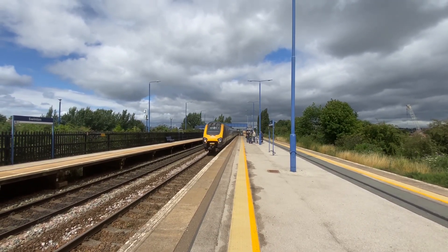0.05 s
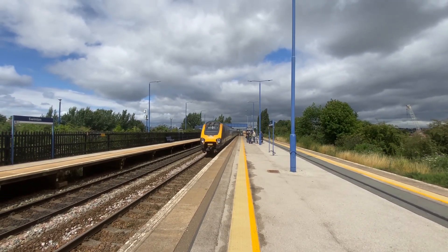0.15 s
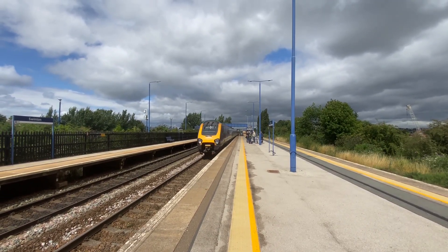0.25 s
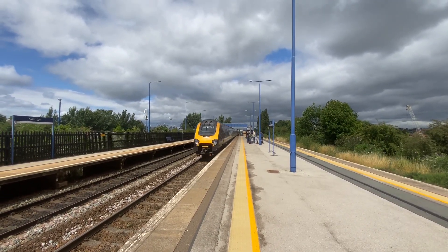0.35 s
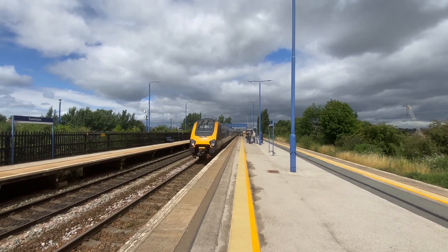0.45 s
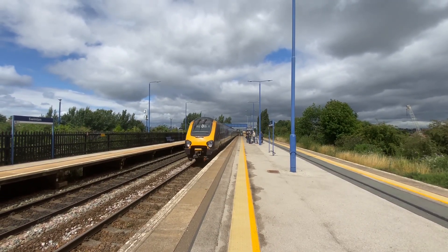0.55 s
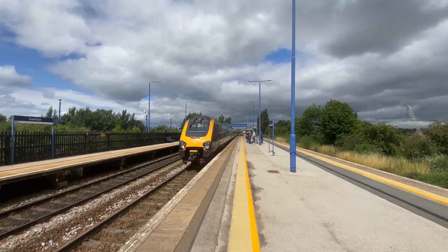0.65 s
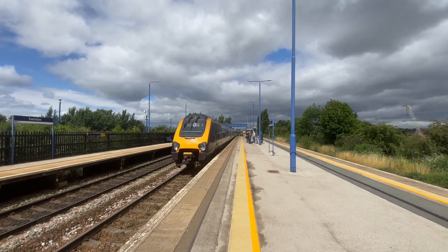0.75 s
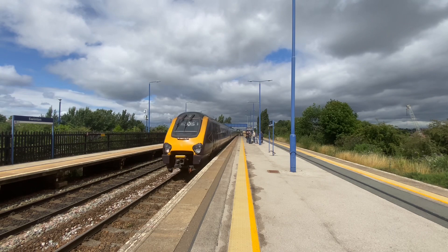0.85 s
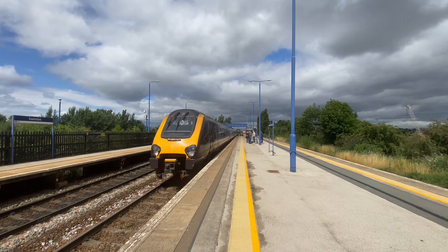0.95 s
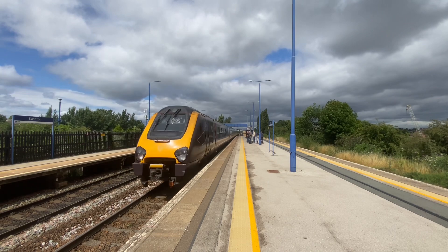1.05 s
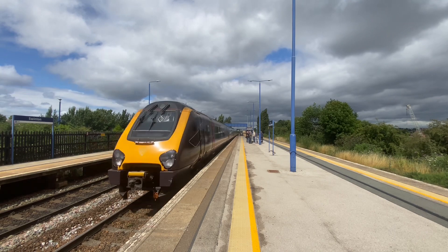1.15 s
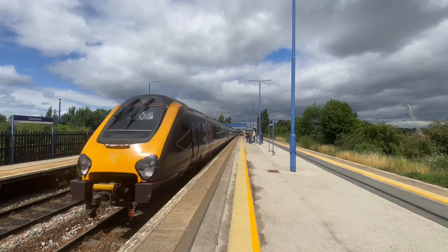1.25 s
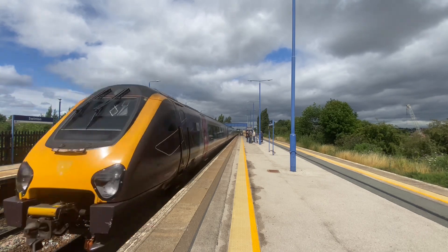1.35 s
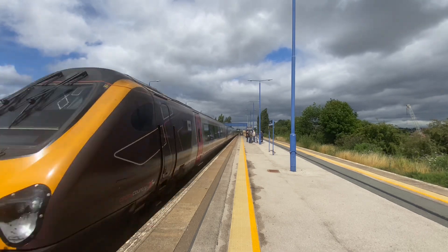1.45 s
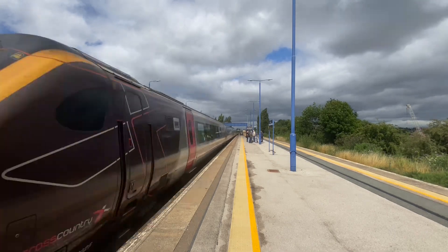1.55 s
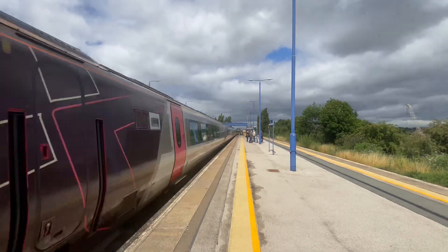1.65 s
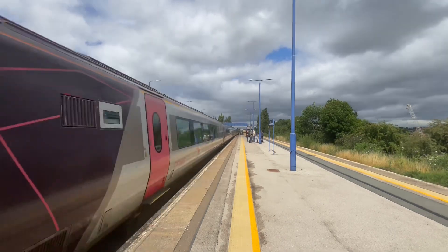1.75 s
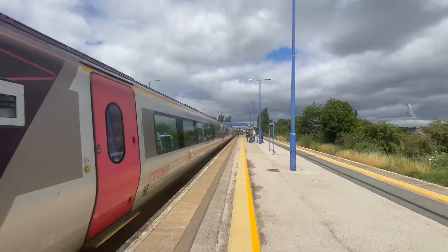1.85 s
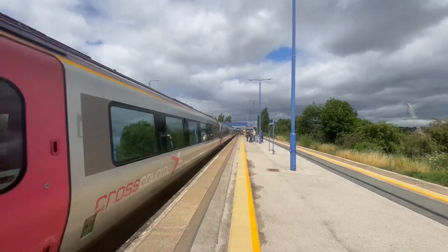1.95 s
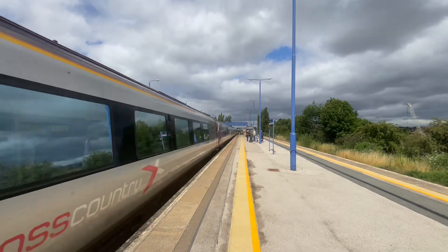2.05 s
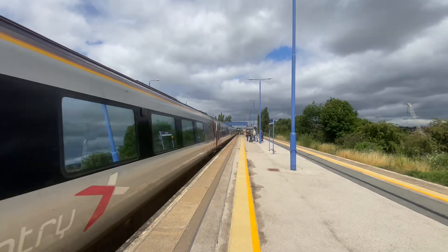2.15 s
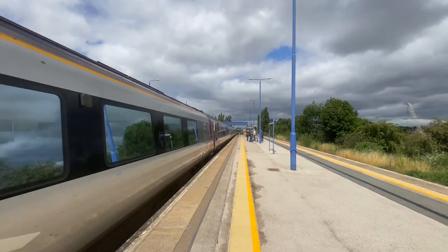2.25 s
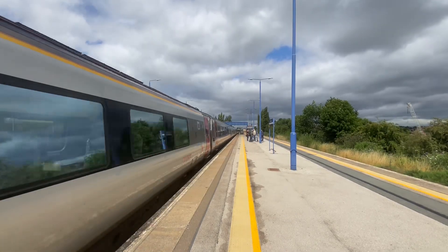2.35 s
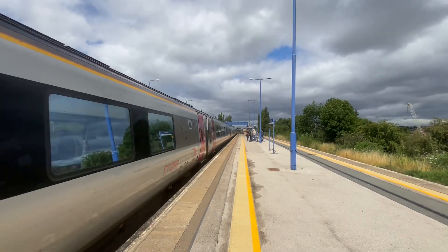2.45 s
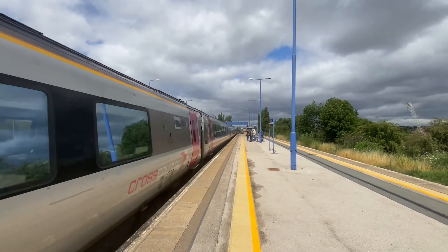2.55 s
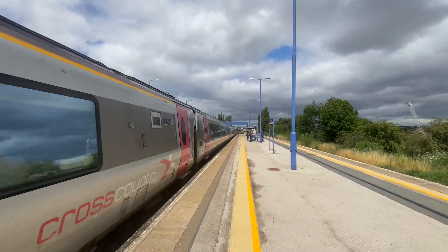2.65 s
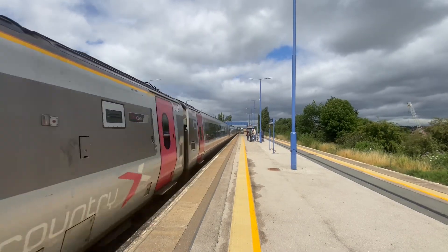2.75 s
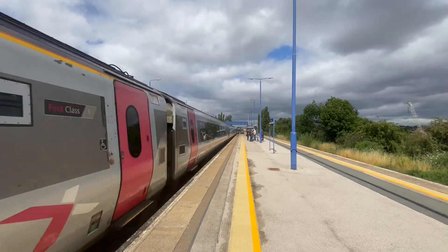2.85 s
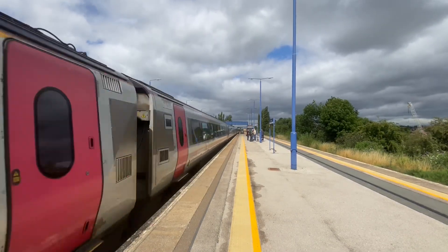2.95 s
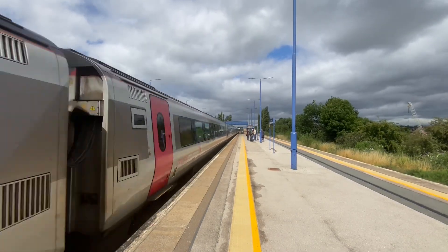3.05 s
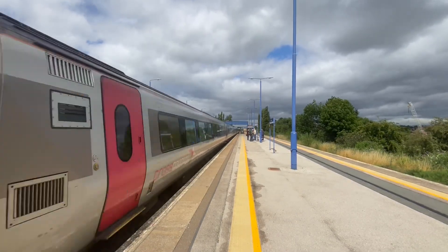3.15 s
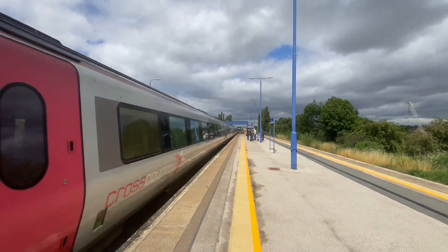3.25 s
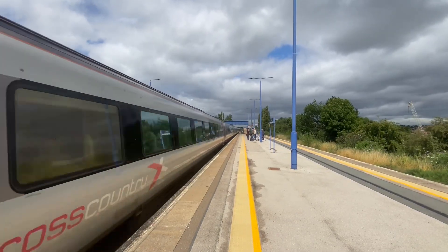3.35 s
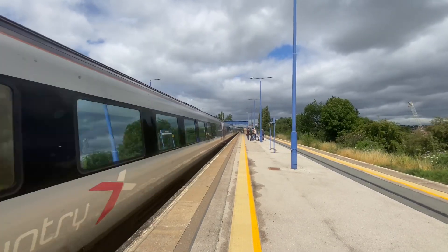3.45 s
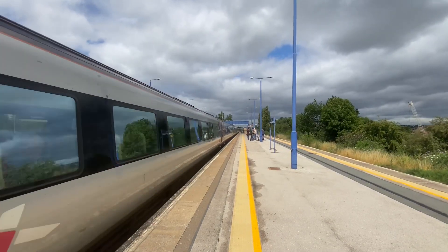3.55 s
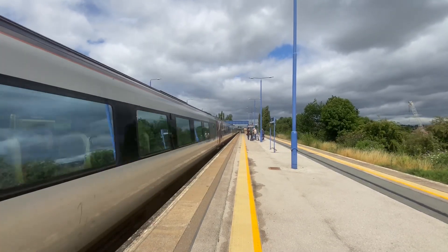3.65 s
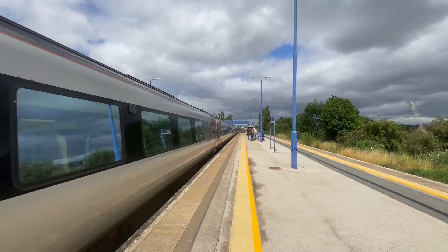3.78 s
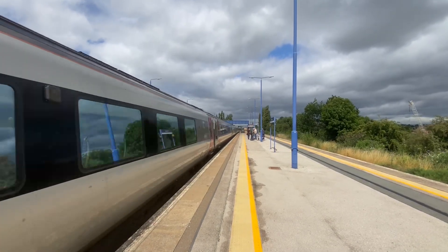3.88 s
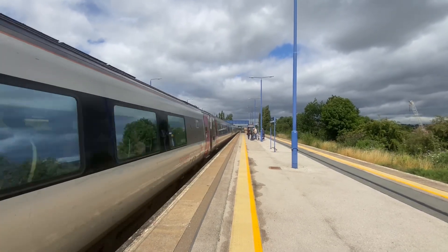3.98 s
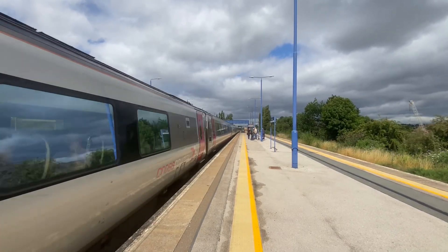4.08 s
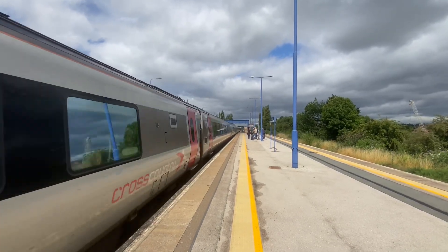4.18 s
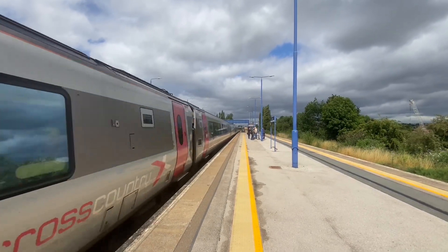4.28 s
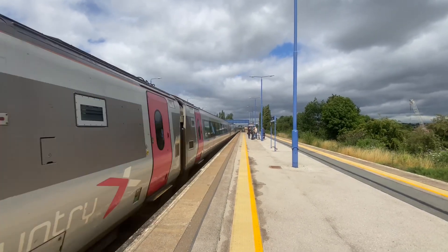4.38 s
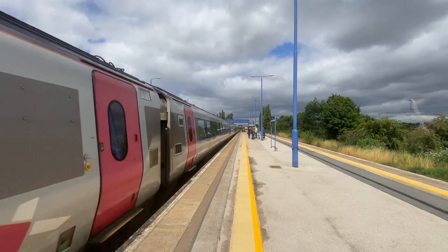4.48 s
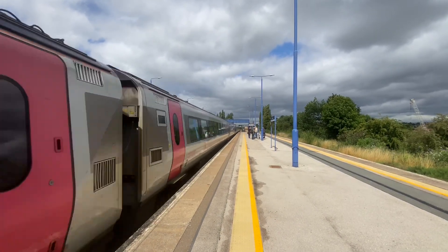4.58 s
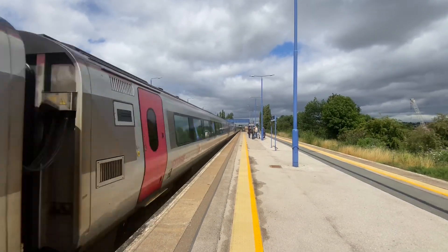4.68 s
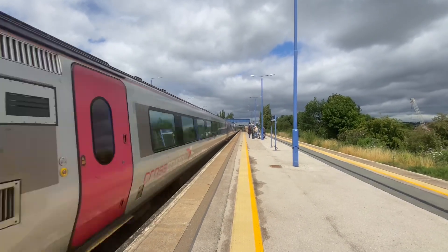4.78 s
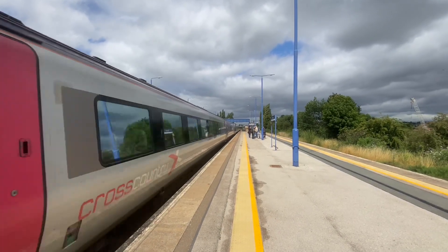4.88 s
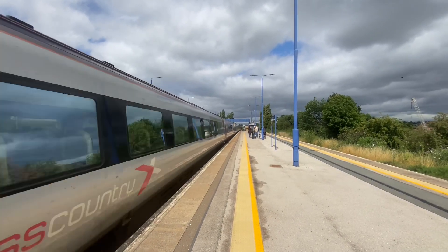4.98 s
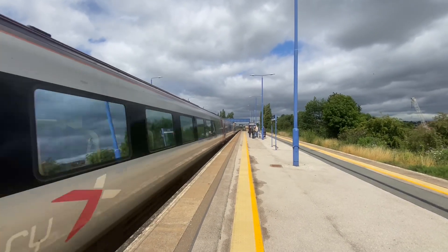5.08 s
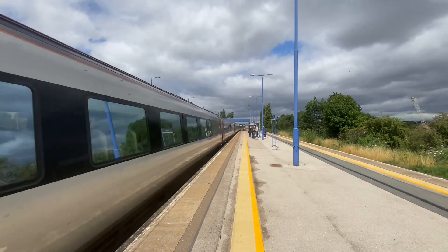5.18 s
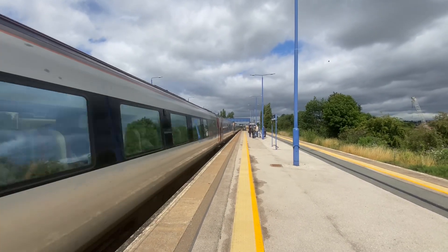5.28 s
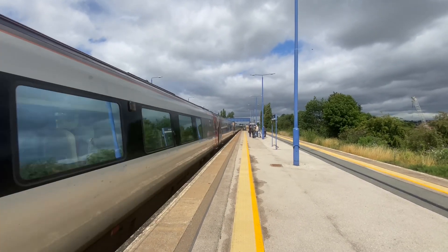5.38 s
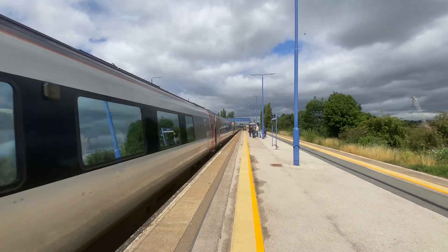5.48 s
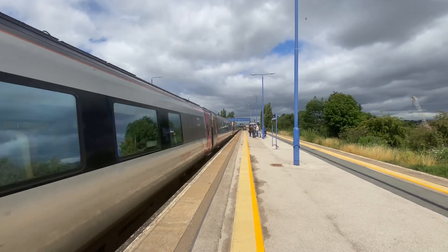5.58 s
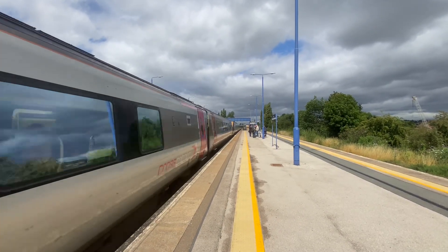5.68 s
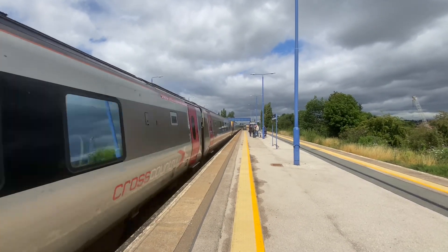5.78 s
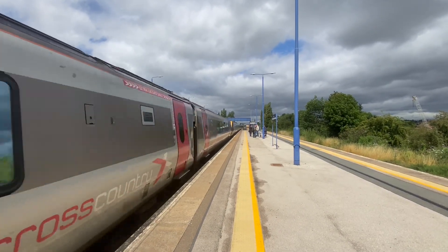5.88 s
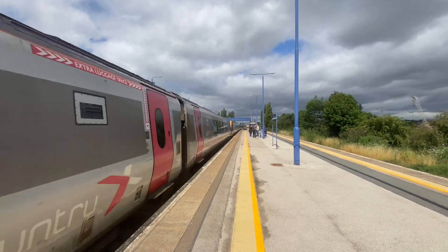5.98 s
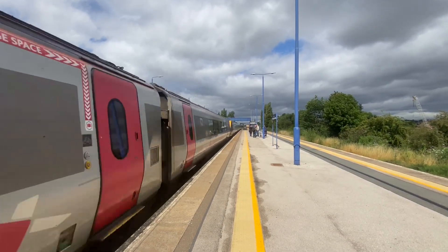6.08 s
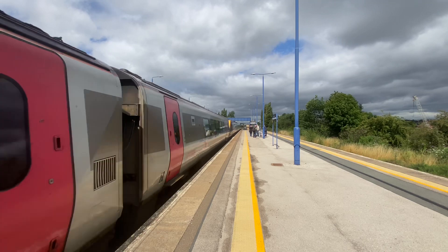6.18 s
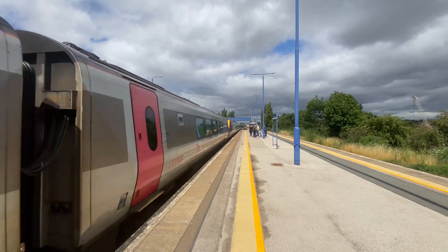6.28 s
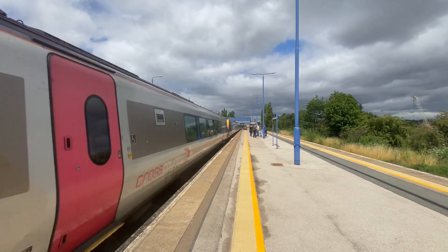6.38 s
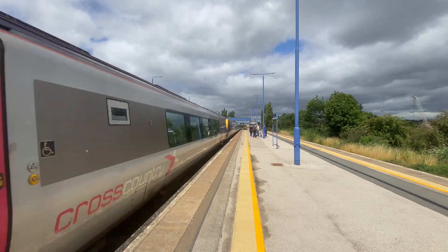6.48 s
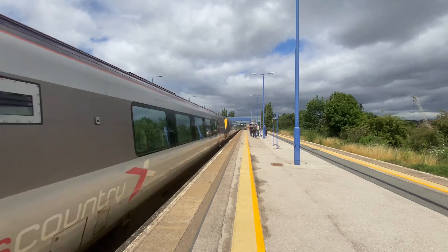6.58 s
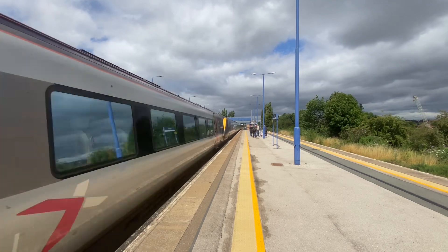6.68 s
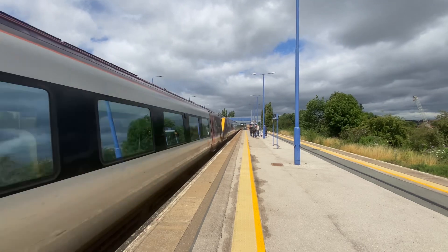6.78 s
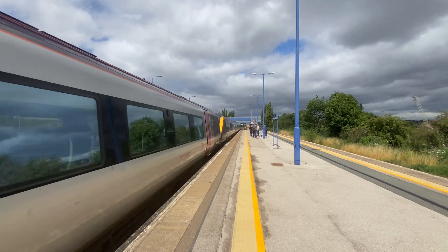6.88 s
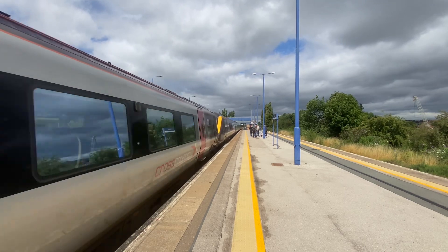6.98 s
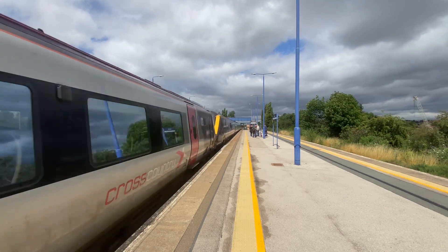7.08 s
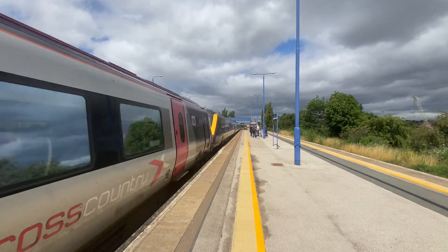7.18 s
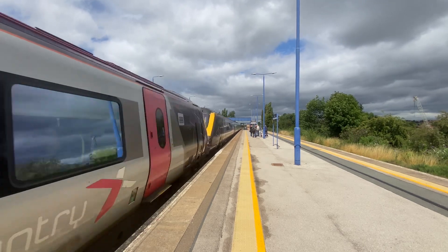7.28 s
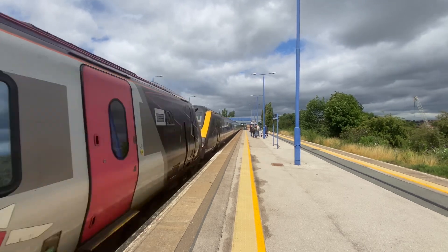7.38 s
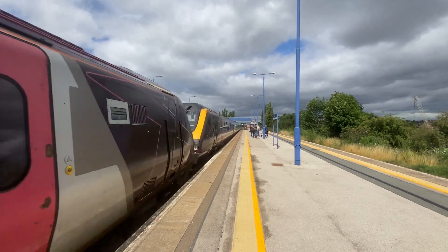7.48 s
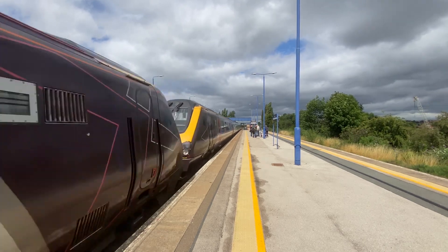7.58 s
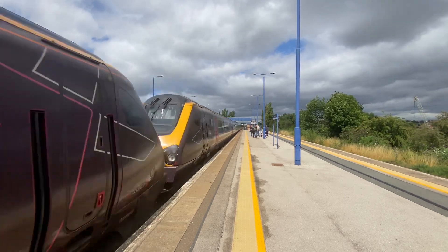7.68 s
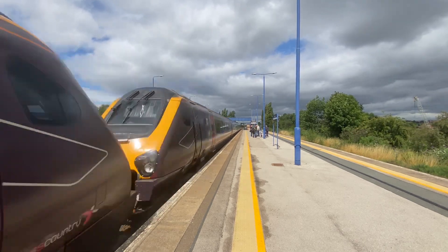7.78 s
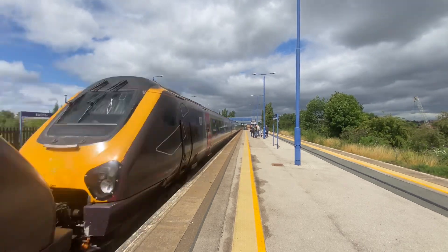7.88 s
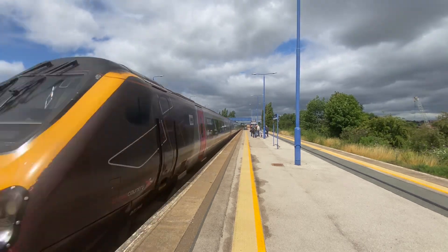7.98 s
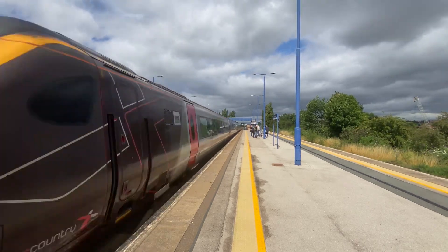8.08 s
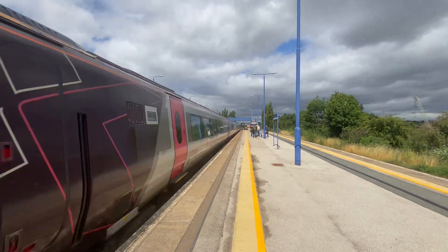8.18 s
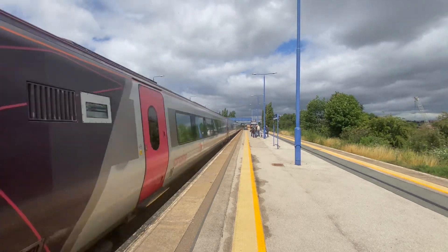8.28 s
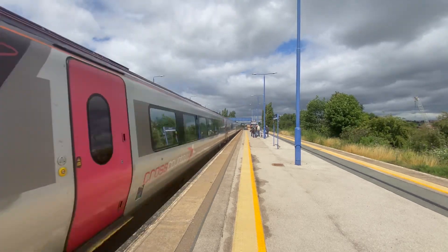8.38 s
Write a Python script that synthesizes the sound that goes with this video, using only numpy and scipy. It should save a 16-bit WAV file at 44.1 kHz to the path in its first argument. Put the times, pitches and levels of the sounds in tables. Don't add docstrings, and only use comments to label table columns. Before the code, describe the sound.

A diesel train swells from a distant rumble into a close roar, wheels thumping, engines droning past and revving higher, air hissing from its sides.

```python
import sys
import numpy as np
from scipy import signal
from scipy.fft import rfft, irfft
from scipy.io import wavfile
from scipy.ndimage import uniform_filter1d

SR = 44100
rng = np.random.default_rng(int(sys.argv[2]) if len(sys.argv) > 2 else 0)


def bounce(signal):
    frames = np.transpose(np.atleast_2d(signal))
    limited = np.clip(frames, -1, 1)
    pcm = np.round(limited * 32767).astype(np.int16)
    wavfile.write(sys.argv[1], SR, pcm)


def gain_from_db(level_db):
    decades = np.asarray(level_db, float) / 20
    return 10 ** decades


N = 372204

TRAIN_M_PER_S, SOUND_M_PER_S = 14.6, 343
ENGINE_M = 3.644


def evened(x):
    return x / np.sqrt(np.mean(abs(x) ** 2) + 1e-20)


def smooth_twice(x, size, axis=-1):
    return uniform_filter1d(uniform_filter1d(x, size, axis), size, axis)


def read(points, hz):
    f, *columns = np.transpose(points)
    return np.array([np.interp(np.log(hz + 1), np.log(f + 1), c) for c in columns])


def add(mix, s, sound):
    part = mix[round(s * SR):][:len(sound)]
    part += sound[:len(part)]


def lobe(past_m, db, spread_m):
    return gain_from_db(db) / (1 + (past_m / spread_m) ** 2) ** 1.38


def roar(patchy_db=1.07, flicker_db=0.92):
    # t/s, level/dB
    passing = [(0, -17), (.6, -15), (1.08, -11.5), (1.3, -7.5), (1.62, -2.5), (1.95, 1.2), (2.15, -0.7),
               (2.7, 3), (3.1, 0.3), (3.7, -2.5), (4.1, 1), (4.8, -1.5), (5.2, -2), (5.8, 4.5),
               (6.45, -0.5), (7.02, 3), (7.4, -1.3), (8.44, -3.5)]
    # level alongside/dB, share of the swell, change per s before the nose arrives/dB
    layers = [
        (-31, 0.66, -7),
        (-21, 1.066, -0.5),
        (-27.5, 0.51, -3.5),
        (-53, 0.4, -1.5),
    ]
    # t/s, level/dB, spread/m
    grilles = [(1.62, -53, 3.5), (2.5, -45, 3.5), (3.92, -62, 2.1), (4.85, -48.5, 4.6), (5.66, -37.5, 2.9),
               (6.72, -39.5, 2.7), (7.0, -26.5, 1.7), (7.16, -34.5, 1.5), (7.62, -44.5, 3.3),
               (8.4, -44.5, 2.96)]
    # f/Hz, level per Hz/dB
    rumble = [(22, -40), (38, -14), (50, -10), (70, 8.5), (110, 1), (180, 8.5), (260, 0.5), (400, -10.5),
              (700, -28), (2000, -68)]
    # f/Hz, level per Hz/dB
    rail = [(100, -48), (250, -14), (400, -1.5), (560, -4.5), (780, -3), (950, -4.5), (1200, -6),
            (1500, -9), (1800, -5.5), (2200, -27), (4000, -47.5)]
    # f/Hz, level per Hz/dB
    wheel = [(900, -45), (2000, -4), (2350, -4), (2700, -10), (3100, -8.5), (3700, -12), (4300, -15),
             (4900, -16), (5500, -18.5), (6400, -17.5), (7200, -22), (9000, -29.5), (13000, -37)]
    # f/Hz, level per Hz/dB
    air = [(600, -40), (1200, 10), (2800, 9.5), (4200, 8), (6000, 6), (7500, 4.5), (10000, 0.5),
           (12000, -3), (13000, -15), (14300, -12), (15100, -12), (15700, -45)]
    # f/Hz, change/dB
    far = [(100, 3), (250, 4), (380, 0), (600, 6.5), (1500, 3.5), (2000, 3.5), (2500, -3), (3000, -8.5),
           (4000, -1), (9000, 0), (12000, 6), (15000, 8)]
    arrival_s = 1.78

    frames, hz = N // 256 + 5, np.fft.rfftfreq(1024, 1 / SR)
    t = np.arange(frames) * 256 / SR
    swell_db = np.interp(t, *np.transpose(passing))
    early = np.maximum(arrival_s - t, 0)
    levels = [gain_from_db(db + share * swell_db + early_db * early) for db, share, early_db in layers]
    levels[-1] = levels[-1] + sum(lobe(TRAIN_M_PER_S * (t - s), db, w) for s, db, w in grilles)
    bands = [(260, 420), (450, 1400), (2000, 3500), (7000, 12000)]  # Hz, where each level holds
    power = 0
    for shape, level, (lo, hi) in zip([rumble, rail, wheel, air], levels, bands):
        density = gain_from_db(read(shape, hz)[0]) ** 2
        density = density / density[(hz >= lo) & (hz < hi)].sum()
        flicker = evened(uniform_filter1d(rng.standard_normal(frames), 4))
        power = power + density * (level * gain_from_db(flicker_db * flicker))[:, None] ** 2

    patches = uniform_filter1d(rng.standard_normal((frames, 513)), 8, 1)
    patches = evened(uniform_filter1d(patches, 14, 0))
    far_db = np.minimum(early, 1)[:, None] * read(far, hz)
    strength = np.sqrt(power) * gain_from_db(patchy_db * patches + far_db)
    noise = rng.standard_normal((frames, 513, 2, 2)) @ np.array([1, 1j])
    z = noise * strength[..., None]
    return 0.79 * signal.istft(z.T, nperseg=1024, noverlap=768)[1][:, :N]


def pipe(hz):
    # note/Hz, half width/Hz, level away from the note/dB
    tail_pipe = (239.5, 14, -10.5)
    note_hz, half_hz, away_db = tail_pipe
    return gain_from_db(away_db) + 1 / (1 + ((hz - note_hz) / half_hz) ** 2)


def engine(beside_s, rate_hz, lobes, thirds, lag=1.77):
    # multiple of a third of the firing rate, level under the third tone/dB
    crank = [(2, -14), (4, -29), (8, -3.5), (10, -14), (11, -12), (12, -8), (13, -19)]
    t = np.arange(max(beside_s - 3, 0), beside_s + 2, 1 / SR)
    past = TRAIN_M_PER_S * (t - beside_s)
    away = np.hypot(past, ENGINE_M)
    hz = rate_hz(t) * (1 - TRAIN_M_PER_S / SOUND_M_PER_S * past / away)
    turn = 2 * np.pi * np.cumsum(hz) / SR

    gains = []
    for m, db, m2, db2, w in lobes:
        first = lobe(past - m, db, w * (1 + 0.025 * abs(m)))
        second = lobe(past - m2, db2, w * (1 + 0.025 * abs(m2)))
        spill = gain_from_db(max(db, db2) - 14) * ENGINE_M / away
        gains.append(first + second + spill)
    tones = sum(g * np.cos(k * turn + (k - 1) * lag) for k, g in zip([1, 2, 3, thirds / 3], gains))
    faint = 0
    for k, db in crank:
        order = round(k) / 3
        phase = 2 * np.pi * rng.random()
        faint = faint + gain_from_db(db) * pipe(order * hz) * np.cos(order * turn + phase)
    uneven = 1 + .06 * evened(smooth_twice(rng.standard_normal(len(t)), 500))
    fade = signal.windows.tukey(len(t), .08)
    return t[0], np.sqrt(2) * (tones + gains[2] * faint) * uneven * fade


def engines_passing():
    engines = [(2.9, 1.001), (4.45, 1.009), (6.05, .995), (7.2, .998), (8.7, .999), (7.45, 1.001)]
    uneven_thirds = [7, 7, 5, 5, 5, 7]
    # t/s, firing rate/Hz
    throttle = [(0, 57.48), (3.6, 57.61), (3.9, 57.91), (4.13, 59.87), (4.36, 62.96), (4.59, 63.89),
                (4.81, 66.23), (5.04, 69.3), (5.26, 71.76), (5.49, 74.09), (5.72, 77.95), (5.95, 79.94),
                (6.2, 82.63), (6.5, 84.28), (6.75, 85.4), (7.0, 88.9), (7.5, 93.9), (8.44, 92.45)]
    # lobe past/m, level/dB, lobe past/m, level/dB, spread/m
    firing = [(-37, -42, -3.5, -16, 6.9), (-2.5, -14, 14.5, -17.5, 6.4), (-9.5, -13, 1.5, -19, 4.2),
              (-7.5, -26, -1, -25, 2.4), (-13.5, -30, -4.5, -28, 2.9), (-2, -35, 3, -40, 3)]
    # lobe past/m, level/dB, lobe past/m, level/dB, spread/m
    octave = [(-11.5, -24, -0.4, -14.5, 2.5), (-12, -25, 0.9, -11.5, 4.5), (-12.5, -13, -0.2, -14, 3.73),
              (-9.5, -23.5, 9, -25, 2.5), (-13, -28, -3.5, -26.5, 3.9), (1, -29.5, 8, -41, 2.2)]
    # lobe past/m, level/dB, lobe past/m, level/dB, spread/m
    twelfth = [(-21, -34.5, -4.5, -24.5, 6), (-18, -37, 1.8, -19, 6.4), (-1.5, -17.5, 5.5, -26.5, 2.9),
               (-7, -30, 7, -37, 3), (-12, -41, -8, -34, 1.6), (4, -33, -1, -50, 2.7)]
    # lobe past/m, level/dB, lobe past/m, level/dB, spread/m
    uneven_tone = [(-30.5, -38.5, -1.2, -20.5, 6.9), (-22, -26, 19, -31, 1.4), (-21, -51, .2, -25, 3.1),
                   (-6.5, -20.5, 15, -34, 4.2), (-21, -48, -7, -33, 2.2), (-3, -48, 3, -51, 3)]

    def pulling(t):
        return np.interp(t, *np.transpose(throttle))

    def idling(t):
        return 62.5 + 0 * t

    out = np.zeros(N)
    rates = [pulling] * (len(engines) - 1) + [idling]
    rows = zip(engines, rates, uneven_thirds, firing, octave, twelfth, uneven_tone)
    for (s, trim), rate, thirds, *lobes in rows:
        add(out, *engine(s, lambda t: trim * rate(t), lobes, thirds))
    return out


def thump(peak_db, hz, lasts=0.016, echo_s=.023, echo_db=-10.0):
    t = np.arange(round(.04 * SR)) / SR
    turn = 2 * np.pi * np.cumsum(hz * (0.867 + 0.733 * np.exp(-t / 0.0041))) / SR
    low, high = rng.uniform(.85, 1.15, 2)
    low_knock = 0.27 * np.sin(2 * np.pi * 300 * low * t)
    high_knock = .5 * np.sin(2 * np.pi * 1.4 * hz * high * t)
    swell_and_fade = (1 - np.exp(-t / 0.0018)) * np.exp(-(t / lasts) ** 2)
    ring = (np.sin(turn) + low_knock + high_knock) * swell_and_fade
    out = np.zeros(round(.15 * SR))
    for k in range(3):
        add(out, k * echo_s, gain_from_db(peak_db + k * echo_db) * ring)
    return out


def flat_wheels():
    flat_s = [.2322, .1515]
    # peak level of the first flat/dB, of the second/dB
    flat_db = [(-26, -36), (-20.5, -40), (-21.5, -33), (-20.5, -35), (-22, -28.5), (-17, -26), (-21, -27),
               (-20.5, -28), (-36, -31), (-16.5, -20)]
    # t/s, peak level/dB
    near_thumps = [(1.78, -22), (2.745, -17), (2.905, -18), (3.359, -17.5), (3.7, -26), (4.351, -22),
                   (4.68, -31), (4.949, -23), (5.491, -19), (5.713, -28), (5.867, -24), (6.515, -24),
                   (6.643, -21), (7.146, -32), (7.552, -17), (8.064, -29)]
    wheel_turn_s = .1631
    blows = []
    for k, levels in enumerate(flat_db):
        blows += [(s + k * wheel_turn_s, db) for s, db in zip(flat_s, levels)]
    out = np.zeros(N)
    for s, db in blows + near_thumps:
        hz = (580 if s < 1.33 else 800) * rng.uniform(0.96, 1.03)
        add(out, s, thump(db, hz))
    return out


def resonate(x, hz, width):
    turn = np.exp(2j * np.pi * np.cumsum(hz) / SR)
    r = np.exp(-np.pi * width / SR)
    return 2 * (turn * signal.lfilter([1 - r], [1, -r], x / turn)).real


def singing():
    # t/s, length/s, f/Hz, width/Hz
    modes = [(1.3, .85, 4860, 200), (1.5, .6, 6420, 250), (1.4, .8, 2325, 400), (2.65, .45, 4740, 350),
             (2.55, 1.15, 2310, 330), (2.3, .9, 3050, 350), (1.35, .8, 780, 130), (6.7, .6, 1735, 160),
             (7.1, .75, 1685, 200), (7.5, .35, 2955, 70), (7.45, .45, 4950, 180), (6.88, .44, 3000, 1200),
             (8.0, .85, 2840, 50), (8.1, .65, 3545, 80), (8.1, .45, 4940, 130), (7.95, .6, 2260, 180),
             (.9, .8, 9500, 250), (2.72, .35, 2550, 600), (6.85, .3, 5700, 1200), (1.55, .3, 5500, 300)]
    modes_db = [-44, -45, -35, -37.5, -30, -33.5, -33, -29, -27, -44, -43, -30, -35, -36.5, -42, -36.5, -56,
                -33.5, -39, -46]
    sag_per_s = .06
    out = np.zeros((2, N))
    for (s, length, mode_hz, width), db in zip(modes, modes_db):
        hz = mode_hz * (1 - sag_per_s * length * np.linspace(-.5, .5, round(length * SR)))
        shaking = rng.standard_normal((2, len(hz)))
        mode = evened(resonate(resonate(shaking, hz, width), hz, width))
        mode = mode * gain_from_db(2.36 * evened(uniform_filter1d(rng.standard_normal(len(hz)), 900)))
        for port, wave in zip(out, mode):
            add(port, s, gain_from_db(db) * wave * np.hanning(len(hz)) ** .5)
    return out


def pop(peak_db, hz):
    u = np.arange(round(.03 * SR)) / SR * hz
    return gain_from_db(peak_db) * 1.1 * np.sin(2 * np.pi * u) * np.exp(-(u / 1.52) ** 2)


def exhaust_pops():
    # t/s, peak level/dB, f/Hz
    pops = [
        (6.746, -11, 161),
        (6.782, -22, 145),
        (6.881, -8, 179),
        (6.913, -9, 167),
        (7.045, -26, 186),
        (7.65, -10, 207),
    ]
    out = np.zeros(N)
    for s, peak_db, hz in pops:
        add(out, s, pop(peak_db, hz))
    return out


def ports(direct, diffuse):
    # f/Hz, likeness 0-1, left leads/rad, left minus right/dB; in the top treble the ports agree, oppose, agree
    port_rows = [(40, .93, .3, -.4), (120, .92, .35, .4), (260, .87, .55, 0), (430, .8, 1.8, 4),
                 (650, .75, 1.8, 9), (850, .76, 1.6, 8), (1250, .82, 2.1, 1.5), (1800, .86, 3., -1.8),
                 (2500, .68, 5.2, 0), (3600, .52, 8.2, 1.6), (5700, .45, 13.7, 1.8), (8000, .35, 16., -.6),
                 (9700, .4, 20., -5.5),
                 (10800, .8, 18.85, -1), (11700, .97, 19.3, 0), (12500, .99, 21.7, 0),
                 (13700, .99, 22.2, 0), (14700, .97, 25.1, 0)]
    like, lead, side_db = read(port_rows, np.fft.rfftfreq(N, 1 / SR))
    like = np.clip(like, 0, 1)
    a, b = rfft(direct), rfft(diffuse)
    right = like * a * np.exp(-1j * lead) + np.sqrt(1 - like ** 2) * b
    return irfft(np.array([gain_from_db(side_db / 2) * a, gain_from_db(-side_db / 2) * right]), N)


def scene():
    direct, diffuse = roar() + singing()
    tones = engines_passing()
    blows = flat_wheels() + exhaust_pops()
    reflected = np.pad(tones, (2500, 0))[:N] + np.roll(blows, 40)
    return ports(direct + tones + blows, diffuse + reflected)


def band_limit(x):
    return signal.sosfilt(signal.butter(12, 16400, fs=SR, output="sos"), x)


def record(dry):
    held = dry / (1 + (dry / 1.01) ** 4) ** (1 / 4)
    return band_limit(held)


dry = scene()
out = record(dry)
bounce(out)
```